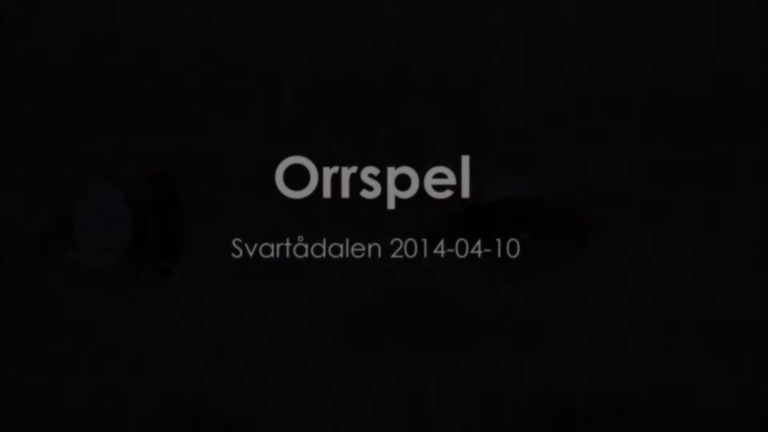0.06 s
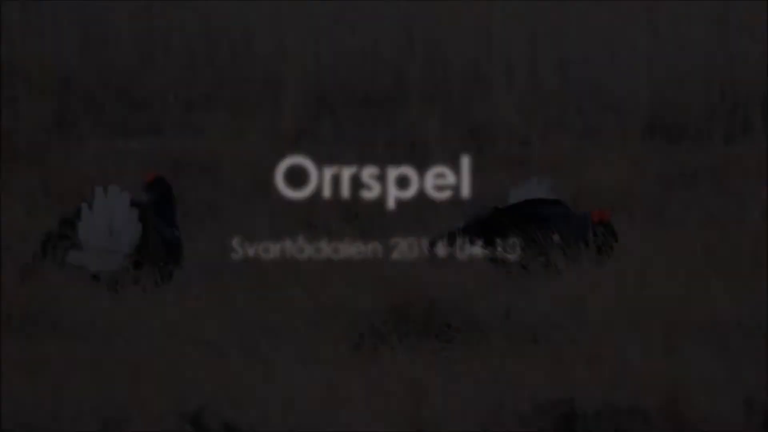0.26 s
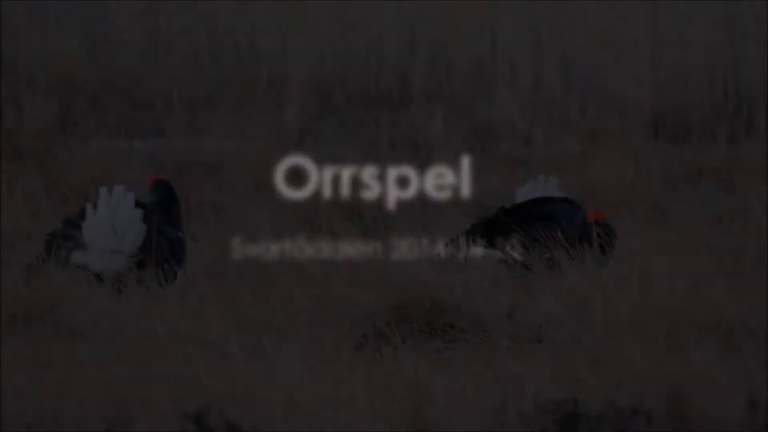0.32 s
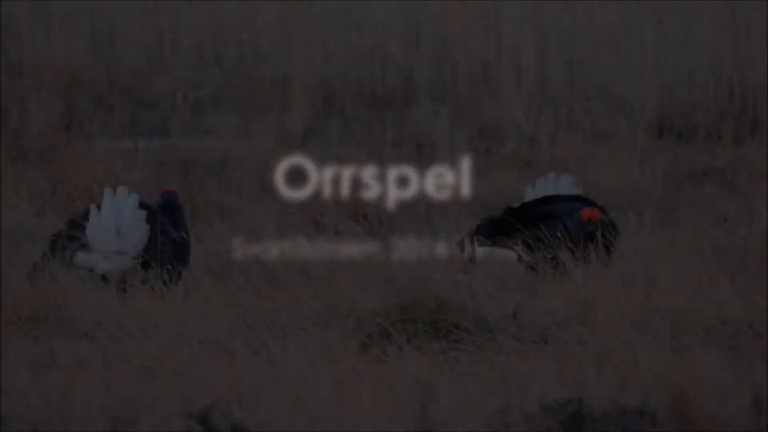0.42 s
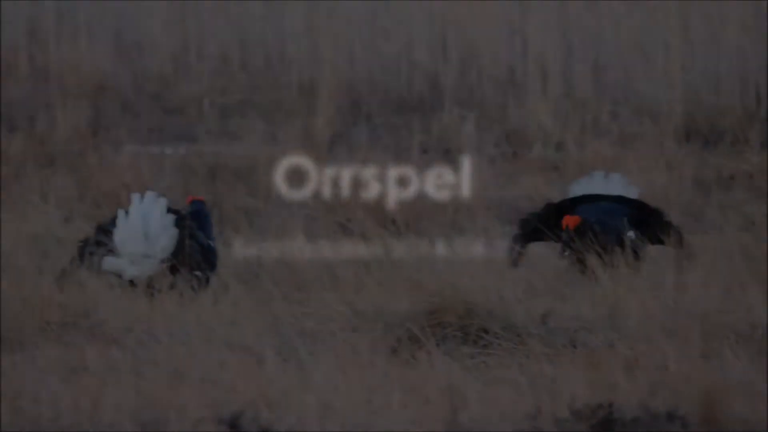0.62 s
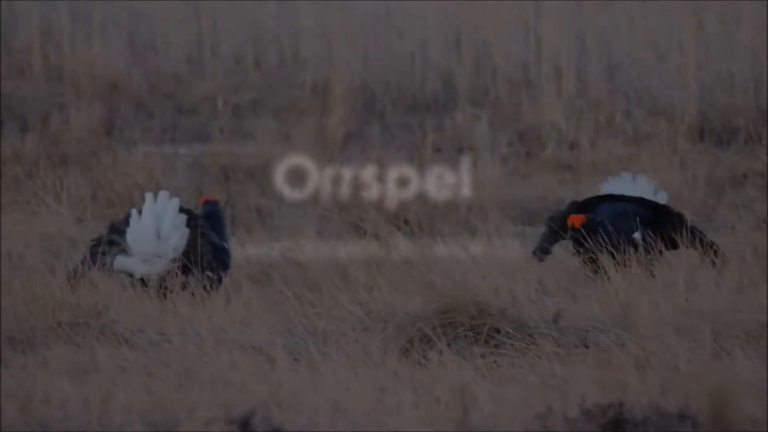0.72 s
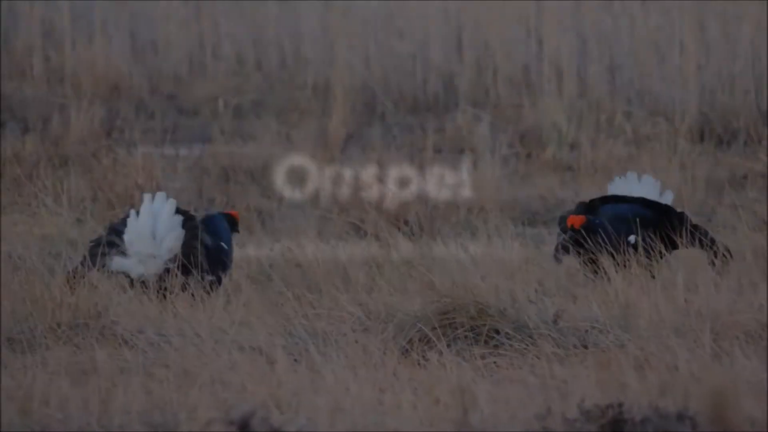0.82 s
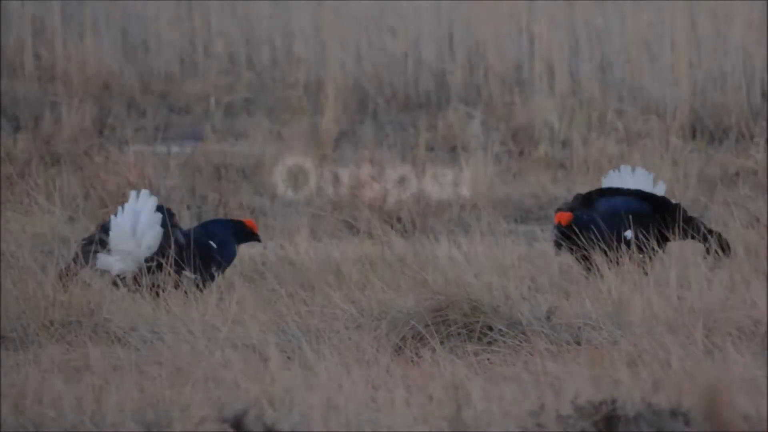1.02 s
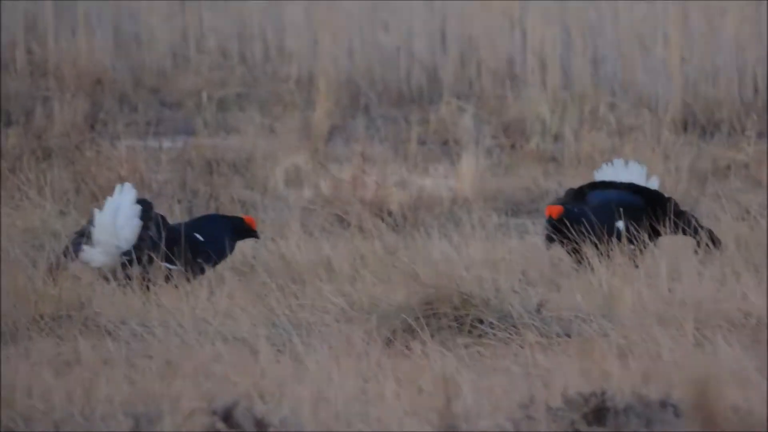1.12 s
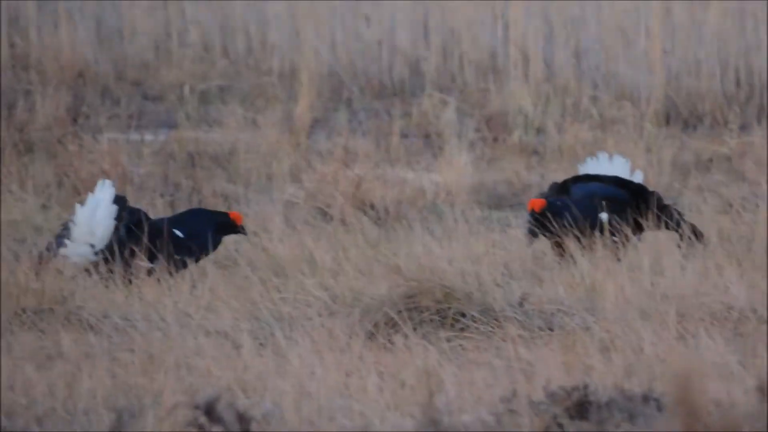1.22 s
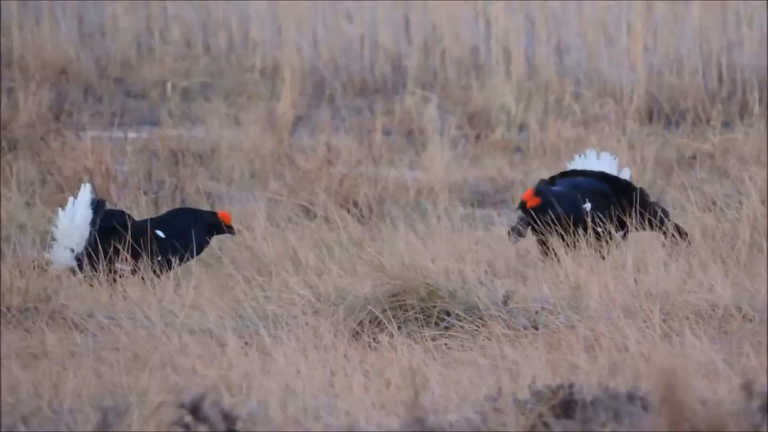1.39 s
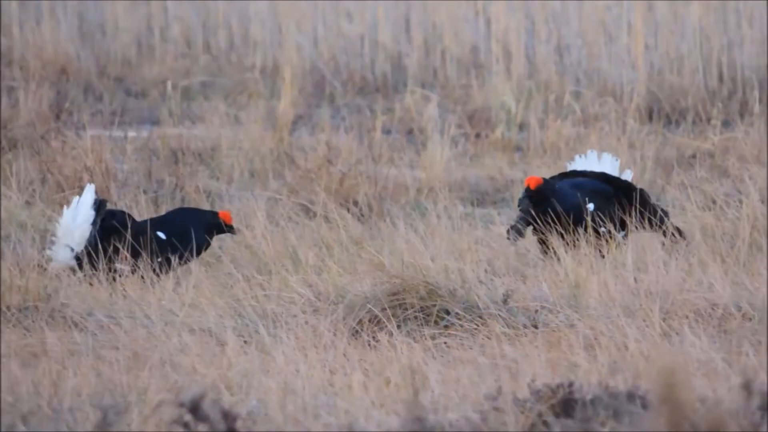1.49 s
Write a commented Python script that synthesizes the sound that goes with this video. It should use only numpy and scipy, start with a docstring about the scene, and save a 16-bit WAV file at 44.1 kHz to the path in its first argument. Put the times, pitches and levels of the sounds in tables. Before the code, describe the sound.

Displaying grouse bubble and coo softly in an open bog, with more of them farther off. A brief, loud click comes close by, followed by one faint rising and falling bird call, all over a constant hiss of air.

```python
"""Black grouse display on an open bog. After a moment of silence come a soft rumble of air and a hiss,
and short low coos start to bubble over a slowly fading chorus of birds farther off. Early on, a small
tick leads into a sharp click close by, the loudest sound. Then a distant bird gives one call that
rises and falls. Dry grass crackles faintly here and there, and soft hums come from far away.
Near the end the hiss swells once while the cooing goes on."""
import sys
import numpy as np
from scipy import signal
from scipy.io import wavfile

SR = 44100
rng = np.random.default_rng(int(sys.argv[2]) if len(sys.argv) > 2 else 0)


def wav_out(sig):
    """Save sig, one row per channel (or a flat mono array), as 16-bit PCM at SR to the path in sys.argv[1]."""
    wavfile.write(sys.argv[1], SR, np.round(np.clip(np.atleast_2d(sig).T, -1, 1) * 32767).astype(np.int16))


N = 68355
T = np.arange(N) / SR

# how strong the air is from low to high: (frequency [Hz], level in a 1 Hz band [dB])
AIR_SPECTRUM = [(25, -78.5), (45, -78), (90, -80), (140, -82.5), (260, -81), (450, -83), (750, -86.5),
                (1100, -90), (2500, -92.5), (4000, -96.5), (8000, -96.5), (14000, -99)]
# which side the air leans to: (frequency [Hz], left minus right [dB])
AIR_BALANCE = [(30, 4), (100, -1), (500, -2.3), (1000, 0.5), (6000, 0), (12000, -1.5)]
# how alike the air is in both ears: (frequency [Hz], likeness [0 to 1])
AIR_CORRELATION = [(30, 0.75), (250, 0.67), (1000, 0.3), (3000, 0.12), (8000, 0.05), (14000, 0.084)]
# the swell of the high hiss: (time [s], level change [dB])
TREBLE_SWELL = [(0, -2), (.55, -1), (.8, -0.3), (1.02, -0.1), (1.19, 5.5), (1.34, -1), (1.55, -1)]
# the gentler swell of the middle range: (time [s], level change [dB])
MIDRANGE_SWELL = [(0, -0.5), (.6, 0), (1.02, 1.4), (1.25, 1), (1.55, -1)]
# faint hums from far away: (middle time [s], length [s], level [dB], pitch [Hz])
FAR_HUMS = [(.39, .09, -60, 317.4), (.70, .13, -57, 255), (1.0, 0.0905, -59, 183), (1.25, .2, -64.5, 312)]
# crackles of dry grass: (time [s], level [dB], centre frequency [Hz])
GRASS_CRACKLES = [(.162, -53, 9500), (.762, -53, 11100), (.806, -54, 10500), (.892, -56, 7360)]
# the path of the distant call: (time [s], pitch [Hz], level [dB])
CALL_CURVE = [(.415, 1467, -67), (.432, 1493, -60.5), (.448, 1660, -48.5), (.464, 1634, -53),
              (.484, 1673, -54), (.498, 1572, -58), (.507, 1450, -57), (.517, 1310, -57),
              (.526, 1364, -50.5), (.54, 1400, -64), (.56, 1390, -74)]
# the click and its rebounds: (time [s], left strength [dB], right strength [dB])
CLICK_HITS = [(0.2346, 12.5, 11.5), (.2415, -22, -25), (0.2463, -14, -9.5), (0.2529, -18, -21)]
# where the clicking thing rings: (frequency [Hz], width [Hz], left boost [dB], right boost [dB])
CLICK_RESONANCES = [(5480, 320, 7.5, 5.5), (6550, 150, 5.5, 7), (7130, 160, 0, 5.5), (7780, 550, 1.5, 4.5),
                    (9880, 810, 1, 11), (10940, 580, -2, 5.5), (12300, 650, 6.5, 10.5),
                    (14300, 540, -2, 10.5)]
# the nearer birds' coos: (middle time [s], length [s], relative level [dB], pitch [Hz], glide [Hz/s])
NEAR_COOS = [(0.125, .02, -44.5, 593, 0), (.151, .032, -44, 601, -2), (0.187, .045, -46.5, 632, 600),
             (0.213, .045, -45, 558, -4), (.25, .04, -49.5, 591, 0), (0.284, .04, -48, 627, 1200),
             (0.321, .04, -51.5, 643, 0), (.371, 0.031, -42.5, 610, 600), (.402, 0.033, -47, 601.6, -900),
             (0.467, 0.037, -44, 604, 1200), (0.504, .04, -49.5, 615, 0), (0.548, 0.051, -46, 630, 2),
             (.635, .04, -43.5, 628.4, -500), (0.653, 0.024, -41, 602, -900), (.725, 0.023, -47, 554, 0),
             (.762, 0.0184, -44, 597, 1500), (0.786, .044, -44.5, 631.6, 0), (0.868, .04, -51, 586, 0),
             (0.894, .044, -46.5, 603.5, 1200), (.944, 0.022, -43.5, 594, -900),
             (0.984, 0.0229, -51, 590, 0), (1.044, 0.053, -48.5, 597.5, -900), (1.121, 0.035, -52, 568, 0),
             (1.164, 0.027, -49.5, 625, 0), (1.196, .036, -46.5, 597, -2500),
             (1.334, 0.024, -47.5, 580, -1800), (1.408, .042, -43, 616, 2),
             (1.467, 0.033, -50.5, 611, 2500), (1.49, 0.019, -47.5, 607, 0), (1.54, 0.035, -50, 631, 0)]

GROUSE_PAN_DB = -3


def from_db(db):
    """Turn decibels into a number to multiply by."""
    return 10 ** (np.asarray(db) / 20)


def rms_one(x):
    """Scale a signal so its average strength (rms) is 1."""
    return x / np.sqrt(np.mean(x ** 2) + 1e-20)


def pan(db):
    """Left and right gains; positive decibels lean left."""
    return from_db([[db / 2], [-db / 2]])


def in_time(rows):
    """Join a table's points with lines, giving a value at every sample."""
    times, *columns = np.transpose(rows)
    return [np.interp(T, times, column) for column in columns]


def at_hz(points, hz):
    """Read a table at one frequency, with octaves evenly spaced."""
    frequencies, values = np.transpose(points)
    return np.interp(np.log(hz), np.log(frequencies), values)


def drift(rate_hz):
    """Smooth random wandering, about 1 in size."""
    step = 40   # samples between random points
    pole = np.exp(-2 * np.pi * rate_hz * step / SR)
    noise = rng.standard_normal(N // step + 2002)
    slow = signal.lfilter([1], [1, -2 * pole, pole * pole], noise)[2000:]
    return np.interp(np.arange(N) / step, np.arange(len(slow)), rms_one(slow))


def band(x, low_hz, high_hz, order=2):
    """Keep the sound between two frequencies."""
    sos = signal.butter(order, [low_hz, min(high_hz, SR / 2 - 1)], "band", fs=SR, output="sos")
    return signal.sosfilt(sos, x + 1e-18)


def note(middle, length, hz, glide=0, waver=np.zeros(N)):
    """A pure tone that swells and fades, and may slide in pitch."""
    out, sounding = np.zeros(N), abs(T - middle) < length / 2
    t = T[sounding] - middle
    phase = 2 * np.pi * (np.cumsum(hz + glide * t + waver[sounding]) / SR + rng.random())
    out[sounding] = np.sqrt(2) * np.cos(np.pi * t / length) * np.sin(phase)
    return out


def with_echo(x, echo_db, fade_s=.25):
    """Add a blurred echo from the grass and the forest edge, different in each ear."""
    tails = rng.standard_normal((2, N)) * from_db(-60 * T / fade_s)
    echo = signal.fftconvolve(x[None], rms_one(tails) / np.sqrt(N), axes=1)[:, :N]
    return x + from_db(echo_db) * echo


def air(flicker_db=.83, middle_from_hz=900, treble_from_hz=5200):
    """Bands of noise: a rumble much alike in both ears and a wide hiss."""
    edges = 20 * 2 ** np.arange(0, 10.1, .5)   # half an octave apart
    (treble_db,), (middle_db,) = in_time(TREBLE_SWELL), in_time(MIDRANGE_SWELL)
    white = rng.standard_normal((2, 2, N)) * np.sqrt(SR / 4)
    out = 0
    for k, (low, high) in enumerate(zip(edges, edges[1:])):
        shared, side = band(white[k % 2], low, high)
        hz = np.sqrt(low * high)
        alike = at_hz(AIR_CORRELATION, hz)
        stereo = np.sqrt(1 + alike) * shared + np.sqrt(1 - alike) * side * [[1], [-1]]
        swell_db = treble_db if hz > treble_from_hz else middle_db if hz > middle_from_hz else 0
        level_db = at_hz(AIR_SPECTRUM, hz) + swell_db + flicker_db * drift(11)
        out = out + pan(at_hz(AIR_BALANCE, hz)) * from_db(level_db) * stereo
    return out


def far_hums():
    """Soft low tones that barely rise out of the rumble."""
    return sum(from_db(db) * note(s, length, hz) for s, length, db, hz in FAR_HUMS)


def grass(width_s=.0031):
    """Each crackle of dry grass is a tiny puff of bright noise."""
    out = 0
    for s, db, hz in GRASS_CRACKLES:
        noise = rms_one(band(rng.standard_normal((2, N)), hz / 1.1, hz * 1.1))
        out = out + from_db(db) * np.exp(-((T - s) / width_s) ** 2) * noise
    return out


def far_grouse(count=100, coo_s=.032, pitch_hz=601.2, spread_hz=45.1):
    """Many far coos, each with its own pitch and slide, blend into a fading chorus."""
    times = (np.arange(count) + rng.random(count)) * T[-1] / count
    pitches = pitch_hz + spread_hz * np.sqrt(3) * rng.uniform(-.99, 1, count)
    glides = 480 * rng.standard_normal(count)   # Hz per second
    chorus = rms_one(sum(note(s, coo_s, hz, glide) for s, hz, glide in zip(times, pitches, glides)))
    level_db = -53 - 6 * T
    return pan(GROUSE_PAN_DB) * from_db(level_db) * with_echo(chorus, echo_db=-11.5)


def far_call(waver_hz=42, rough_db=3):
    """A bird's whistle rises, holds and drops; quick wobbles make it hoarse."""
    hz, db = in_time(CALL_CURVE)
    sounding = (T > CALL_CURVE[0][0]) & (T < CALL_CURVE[-1][0])
    phase = 2 * np.pi * np.cumsum(hz + waver_hz * drift(142)) / SR
    voice = np.sqrt(2) * from_db(db + rough_db * drift(210)) * sounding * np.sin(phase)
    return pan(-7) * with_echo(voice, echo_db=-9.5)


def tick(time_s=.2037, length_s=.0021, hz=2394, bounce_s=.0017):
    """A small dull tick with one softer bounce."""
    first = note(time_s, length_s, hz)
    bounce = from_db(-5.5) * note(time_s + bounce_s, length_s / 2, hz)
    return pan(3.5) * from_db(-34.5) * (first + bounce)


def click(ring_s=.013, tail_s=.18):
    """A hard snap and its rebounds ring a small bright body, with a weak lower crack and a noisy tail."""
    hits = np.zeros((2, N))
    for s, left_db, right_db in CLICK_HITS:
        hits[:, int(s * SR)] = from_db([left_db, right_db])
    age = np.maximum(T - CLICK_HITS[0][0], 0)
    scatter = (age > 0) * rng.standard_normal((2, N))
    tail = scatter * from_db(-60 * age / tail_s)
    ring = scatter * from_db(-14.5 - 60 * age / ring_s)
    snap = hits + pan(1) * (from_db(-39.5) * tail + ring)
    # the body favours a band of treble and boosts its own ringing pitches
    body = signal.sosfilt(signal.cheby1(8, .5, 5130, "high", fs=SR, output="sos"), snap + 1e-18)
    body = signal.sosfilt(signal.butter(8, 10900, "low", fs=SR, output="sos"), body)
    for hz, width, left_db, right_db in CLICK_RESONANCES:
        resonance = signal.lfilter(*signal.iirpeak(hz, hz / width, fs=SR), body)
        body = body + (from_db([[left_db], [right_db]]) - 1) * resonance
    crack = pan(-7.5) * from_db(-18) * band(snap, 1390, 4850, order=7)
    lingering = from_db(-35.5) * band(tail, 5050, 6150, order=3)
    return body + crack + lingering


def near_grouse(gain_db=-.5, waver_hz=12.6):
    """The nearer males give nearly pure coos in a quick bubbling run."""
    waver = waver_hz * drift(48)
    coos = sum(from_db(db) * note(s, length, hz, glide, waver) for s, length, db, hz, glide in NEAR_COOS)
    return pan(GROUSE_PAN_DB) * from_db(gain_db) * with_echo(coos, echo_db=-12)


def scene():
    """Birds, hums, tick, click, grass and air together."""
    return near_grouse() + far_grouse() + far_call() + far_hums() + tick() + click() + grass() + air()


def record(dry, start_s=.062, fade_in_s=.003, cutoff_hz=14150):
    """The sound cuts in after a short silence; the loudest peak is flattened and the top treble is cut."""
    fade_in = np.clip((T - start_s) / fade_in_s, 0, 1)
    clipped = np.clip(dry * fade_in, -1, 1)
    return signal.sosfilt(signal.ellip(12, .1, 100, cutoff_hz, fs=SR, output="sos"), clipped)


dry = scene()
out = record(dry)
wav_out(out)
```